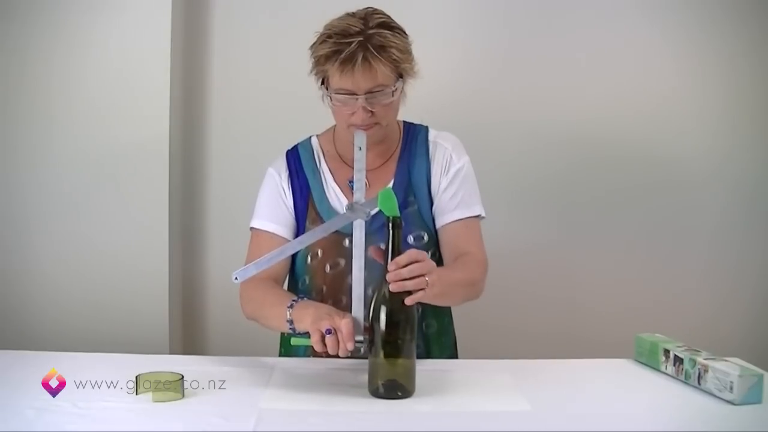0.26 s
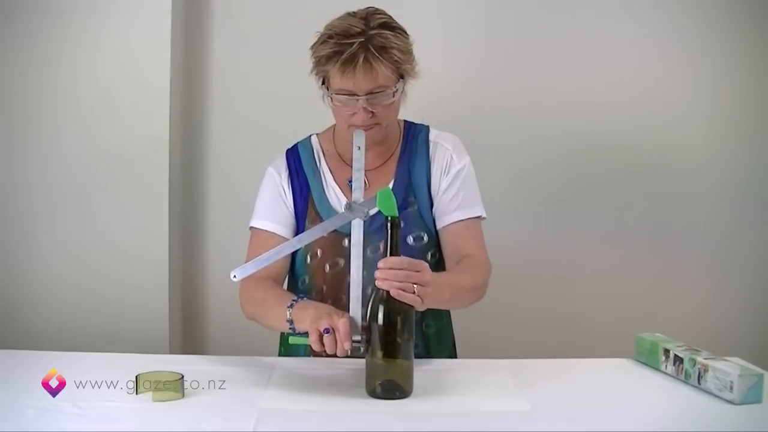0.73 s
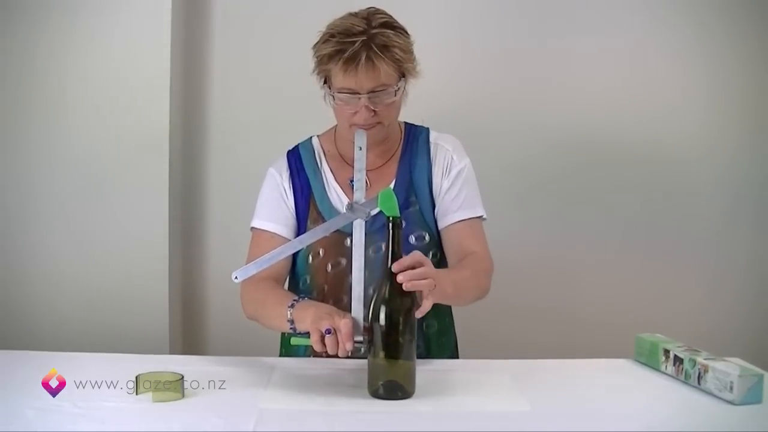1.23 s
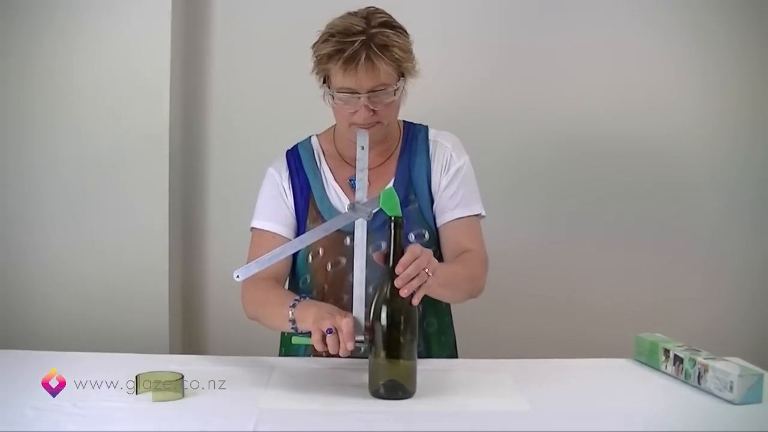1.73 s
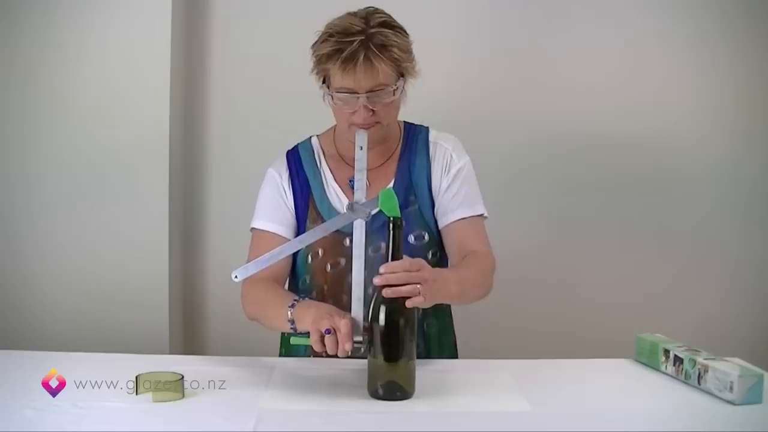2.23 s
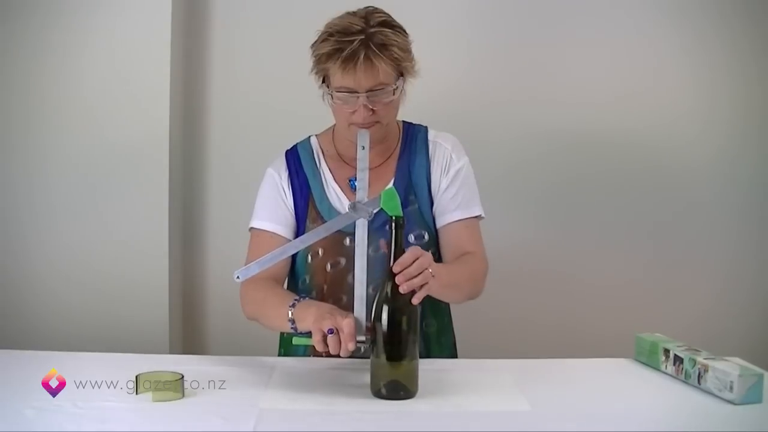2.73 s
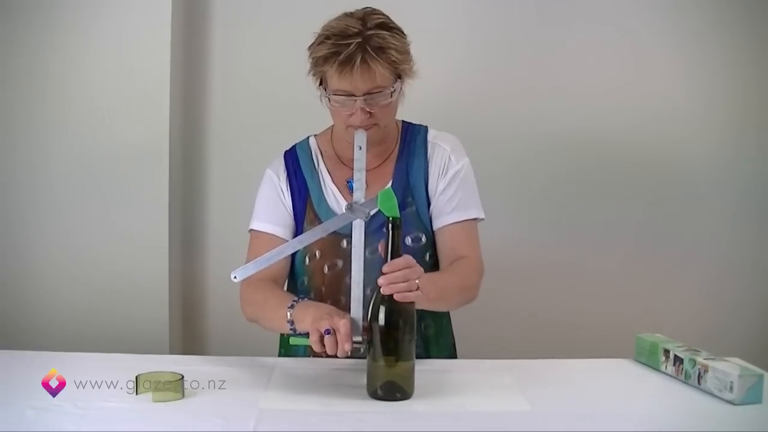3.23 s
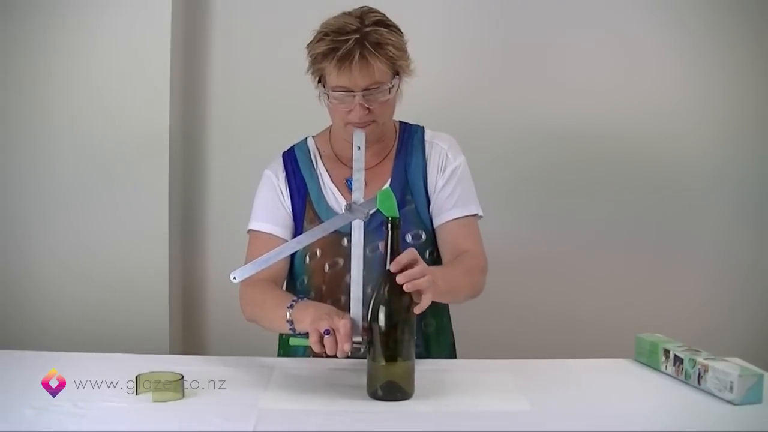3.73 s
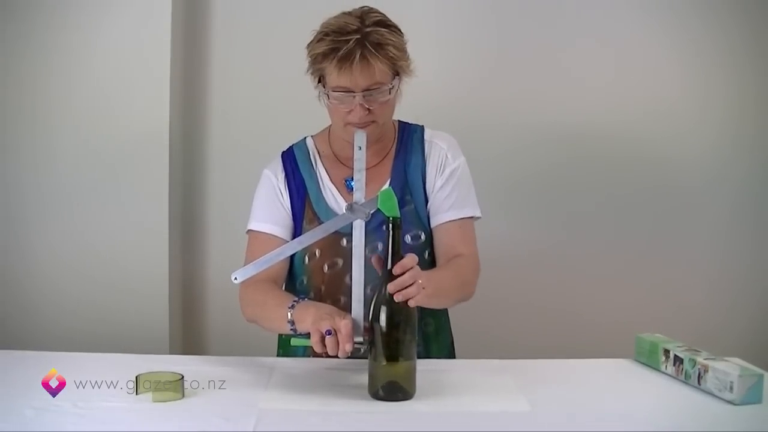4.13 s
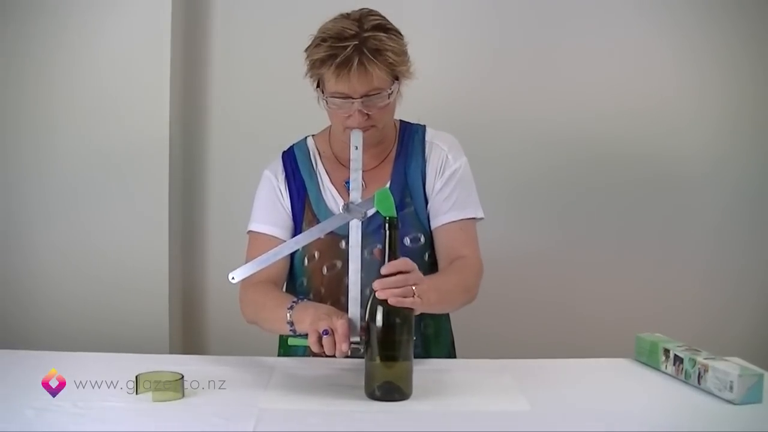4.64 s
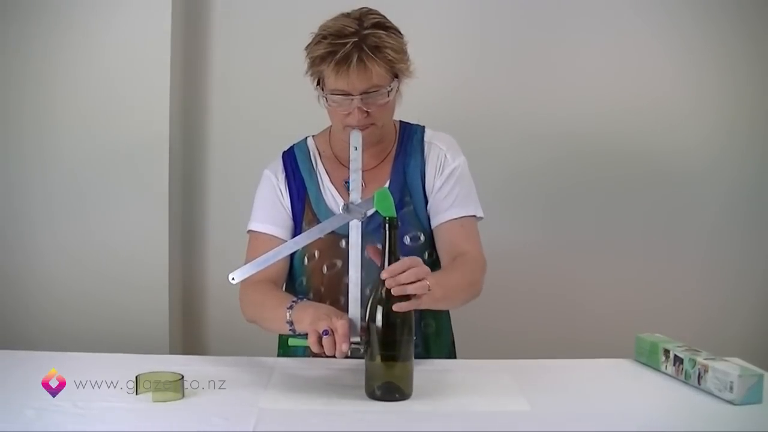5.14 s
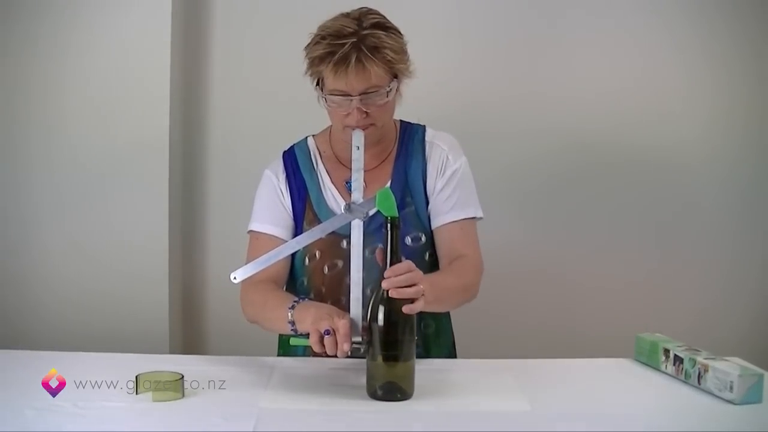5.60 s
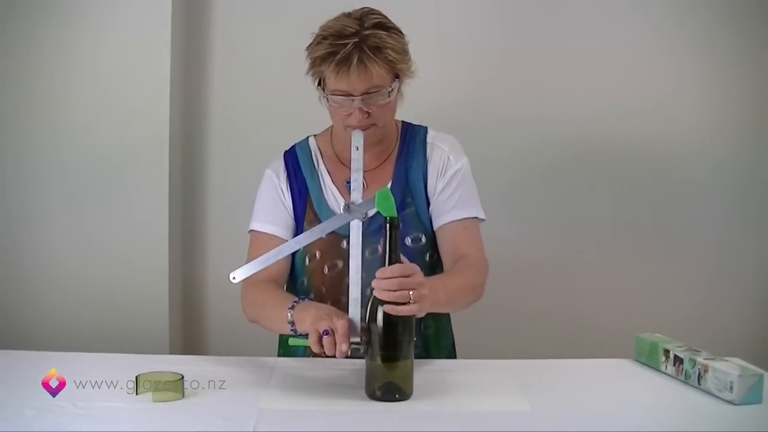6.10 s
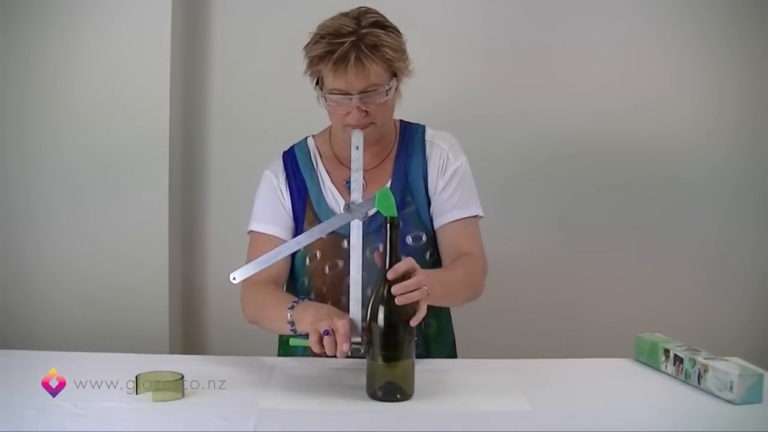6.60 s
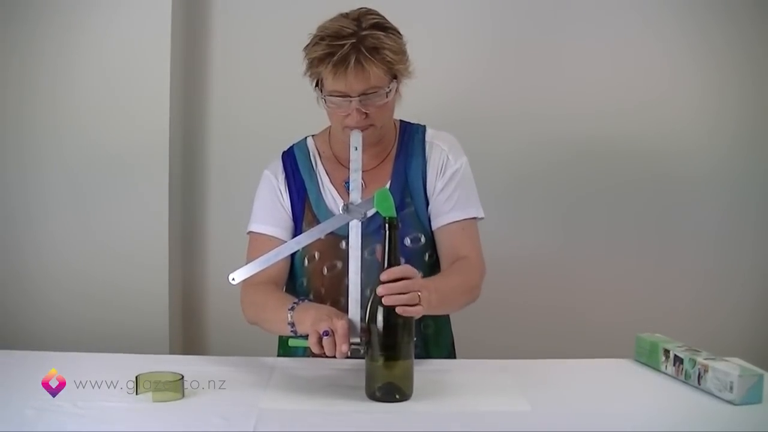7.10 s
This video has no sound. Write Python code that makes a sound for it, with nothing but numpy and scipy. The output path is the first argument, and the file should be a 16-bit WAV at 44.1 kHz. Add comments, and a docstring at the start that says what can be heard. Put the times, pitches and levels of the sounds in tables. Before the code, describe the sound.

In a quiet humming room, a hand-turned bottle crackles and rasps in brief uneven bursts, with a sharp glassy knock past the middle.

```python
"""A glass bottle is turned by hand against the wheel of a metal bottle cutter, on a bench in a small humming room.
After a dry tick of grit, each push crushes a score line in tiny chips and opens with a bright bite of flakes,
while the base grinds on the bench; the glass rings higher when held firmly, and now and then the palm rubs it.
Later the skidding wheel squeaks briefly, a finger ring touches the glass, and the cutter knocks on the bottle.
Chips, slips and rubs are random impulses through resonant filters; ticks, touches and knocks are single rings."""
import sys
import numpy as np
from scipy import signal
from scipy.fft import rfft, irfft
from scipy.io import wavfile

SR = 44100
rng = np.random.default_rng(int(sys.argv[2]) if len(sys.argv) > 2 else 0)


def output_pcm(signal):
    """Save a mono or channel-first signal as 16-bit PCM at the path in sys.argv[1].

    Samples are clipped to [-1, 1] before scaling.
    """
    pcm = np.clip(np.atleast_2d(signal).T, -1, 1) * 32767
    wavfile.write(sys.argv[1], SR, np.round(pcm).astype(np.int16))


N = 324511
TIME = np.arange(N) / SR
EDGE_HZ = 14500  # upper band limit of the sound

# the hand pushes the bottle round against the wheel:
# start_s, length_s, level_db (relative, of the scoring), rise_s, grip (0 loose - 1 firm)
PUSHES = [ (0.254, 0.038, -41, 0.034, 0.058), (0.324, 0.05, -53, 0.01, 0.05),
          (0.461, 0.047, -45.5, 0.0036, 0.067), (0.569, 0.022, -45, 0.0075, 0.043),
          (0.625, 0.054, -38, 0.036, 0.03), (0.708, 0.067, -36.5, 0.016, 0.037),
          (0.99, 0.038, -53.5, 0.018, 0.03), (1.772, 0.089, -43, 0.017, 0.019),
          (1.9, 0.14, -37, 0.015, 0.024), (2.067, 0.051, -36, 0.015, 0.018),
          (2.972, 0.082, -41, 0.011, 0.56), (3.088, 0.22, -39.5, 0.01, 0.04),
          (3.27, 0.071, -35, 0.022, 0.05), (3.345, 0.051, -42, 0.013, 0.064),
          (4.4, 0.068, -58, 0.0068, 0.87), (4.539, 0.063, -40.5, 0.033, 0.98),
          (4.642, 0.16, -36, 0.055, 0.87), (5.567, 0.018, -43.5, 0.012, 0.13),
          (5.628, 0.093, -48, 0.0066, 0.097), (5.757, 0.11, -46, 0.018, 0.07),
          (5.957, 0.07, -55, 0.005, 0.1), (6.029, 0.093, -35.5, 0.063, 0.3),
          (6.883, 0.1, -46.5, 0.0029, 0.76), (7.007, 0.047, -40, 0.0089, 0.79),
          (7.125, 0.023, -47, 0.0053, 0.95), (7.147, 0.041, -41.5, 0.005, 0.95),
          (7.271, 0.026, -45.5, 0.016, 1), ]
# broad spectrum of a breaking chip of glass: frequency_hz, density_db (relative, per Hz)
CHIP_SPECTRUM = [(100, -36), (500, 3), (1100, -5), (2000, -0.5), (2750, 0.5), (3600, 4.5), (4500, -1.5),
                 (5200, -5.5), (6400, -6.5), (8200, -9.5), (9000, -9), (10200, -10.5), (11400, -8),
                 (12800, -16), (15000, -17)]


def amp(db):
    """Gain for a level in dB."""
    return 10 ** (np.asarray(db) / 20)


def unit(x):
    """Scale a signal to rms 1."""
    return x / np.sqrt(np.mean(x ** 2) + 1e-20)


def read(points, hz):
    """Read a curve between its points, along a logarithmic frequency axis."""
    point_hz, value = np.transpose(points)
    return np.interp(np.log(hz + 1), np.log(point_hz + 1), value)


def add(mix, start_s, sound):
    """Lay a sound into the mix, cut off where the mix ends."""
    part = mix[round(start_s * SR):][:len(sound)]
    part += sound[:len(part)]


def wander(hz):
    """Smooth random drift of rms 1, with rates mostly below hz."""
    f = np.fft.rfftfreq(N, 1 / SR)
    spectrum = rfft(rng.standard_normal(N)) * np.exp(-(f / hz) ** 2)
    return unit(irfft(spectrum, N))


def response(spectrum, modes=(), treble_db=0, ring_db=0, size=32768):
    """Causal impulse response, of energy 1, of a broad spectrum with resonances standing on it."""
    f = np.fft.rfftfreq(size, 1 / SR)
    peaks = 1 + sum(amp(db + ring_db) ** 2 / (1 + (2 * (f - hz) / width) ** 2) for hz, width, db in modes)
    shelf_db = treble_db * np.clip((f - 3200) / 1600, 0, 1)
    magnitude = amp(read(spectrum, f) + shelf_db) * np.sqrt(peaks)
    cepstrum = irfft(np.log(magnitude))
    cepstrum[1:size // 2] *= 2  # folding it forward in time makes the ring follow the blow
    cepstrum[size // 2 + 1:] = 0
    h = irfft(np.exp(rfft(cepstrum)))[:size // 2]
    return h / np.linalg.norm(h)


def through(x, h):
    """Let a signal excite a body with impulse response h."""
    return signal.oaconvolve(x, h)[:N]


def crackle(per_s, spread_db):
    """Random fractures, many small and a few large, of rms 1."""
    size = amp(spread_db * np.minimum(rng.exponential(1, N), 4))
    sign = rng.choice([-1, 1], N)
    happens = rng.random(N) < per_s / SR
    return unit(size * sign * happens)


def strikes(rows, spectrum, modes=()):
    """Single blows, each ringing the same body."""
    out = np.zeros(N)
    for start_s, peak_db, *colour in rows:  # colour: treble and extra ring, in dB
        h = response(spectrum, modes, *colour)
        add(out, start_s, amp(peak_db) * h / abs(h).max())
    return out


def stroke(start_s, length_s, level_db, rise_s, release_s):
    """Gain of one movement of the hand: it builds up, holds, and dies away."""
    t = TIME - start_s
    build = np.clip(t / rise_s, 0, 1)
    return amp(level_db) * build * np.exp(-np.maximum(t - length_s, 0) / release_s)


def strokes(rows, rise_s, release_s):
    """Gain of a series of like movements, the strongest at each moment."""
    return np.max([stroke(*row, rise_s, release_s) for row in rows], axis=0)


def background(air_db=-47.72, edge_hz=13700):
    """Soft room noise, near mono in the bass and wider above, with a low hum and wavering drones."""
    # the still room: frequency_hz, density_db (relative, per Hz)
    air_spectrum = [(15, -63), (25, -36), (48, 0), (70, -5.5), (101, -0.5), (150, -3.5), (185, 1),
                    (222, -14), (267, -3), (397, -5.5), (573, -13), (620, -11), (1170, -19.5),
                    (1330, -21.5), (13500, -40.5)]
    # how wide the room noise is: frequency_hz, side_minus_mid_db
    air_width = [(60, -17), (110, -17), (200, -15), (380, -16.5), (700, -12), (1290, -8), (2380, -8),
                 (4400, -7), (8120, -13), (15000, -22)]
    # hum and drones: pitch_hz, level_db (rms), width_hz (from the drifting phase)
    hum_tones = [(99.1, -56.5, 0.36), (181.4, -59.5, 4.24), (259.4, -56.5, 12.8), (616, -72.5, 8.2)]
    f = np.fft.rfftfreq(N, 1 / SR)
    colour = amp(read(air_spectrum, f)) * (f < edge_hz)
    mid = irfft(rfft(rng.standard_normal(N)) * colour, N)
    side = irfft(rfft(rng.standard_normal(N)) * colour * amp(read(air_width, f)), N)
    air = amp(air_db) * unit(np.array([mid + side, mid - side]))
    hum = 0
    for hz, level_db, width_hz in hum_tones:
        drift = np.cumsum(rng.standard_normal(N)) * np.sqrt(2 * np.pi * width_hz / SR)
        waver = amp(2.1 * wander(hz=3.9))
        hum = hum + amp(level_db) * unit(np.sin(2 * np.pi * hz * TIME + drift) * waver)
    return (air + hum) * amp([[.3], [-.3]])  # a touch louder on the left


def grit():
    """Dry ticks of grit: single impulses with a broad spectrum and no resonances."""
    # start_s, peak_db (dry), treble_db
    ticks = [(0.1408, -34.5, -5), (0.3436, -26.5, -20), (0.4502, -22.5, -1), (1.7195, -29.5, -7),
             (1.8757, -19.5, -5), (2.6748, -39, 0), (6.2462, -30.5, -7)]
    # frequency_hz, density_db (relative, per Hz)
    grit_spectrum = [(200, -18), (1000, -12), (2200, 1.5), (4000, 4), (6000, -5.5), (11000, -4.5),
                     (15000, -26)]
    return strikes(ticks, grit_spectrum)


def pushing(lag_s=0, release_s=0.018):
    """How hard each push drives the wheel over the glass until it rolls to a stop, as gains: pushes x time."""
    return np.array([stroke(start_s + lag_s, length_s, level_db, rise_s, release_s)
                     for start_s, length_s, level_db, rise_s, _ in PUSHES])


def judder(slips_per_s=80, uneven=.7, fade_s=0.0029, size_db=4, rolling=0.19):
    """The wheel sticks and slips at uneven intervals, on top of a steady roll; rms 1."""
    rate = slips_per_s * np.exp(uneven * wander(hz=61.45))
    count = np.floor(np.cumsum(rate) / SR)
    size = amp(size_db * (2 * rng.random(N) - 3))  # from -3 to -1 times size_db
    slips = np.diff(count, prepend=0) * size
    fading = signal.lfilter([1], [1, -np.exp(-1 / (fade_s * SR))], slips)
    return unit(rolling + fading)


def bottle(fractures, regrip_s=0.0081):
    """The glass rings with each fracture, in the loose or the firm set of resonances as the grip has it."""
    # the bottle held loosely, then firmly: frequency_hz, width_hz, prominence_db (above the broad spectrum)
    loose_modes = [(1980, 35, 6), (2586, 18, 1), (2573, 64, 18), (2903, 28, 18), (3330, 93, 3.5),
                   (4134, 10, 22), (4020, 30, 12.5), (4530, 57, 19), (4690, 50, 18), (5830, 59, 9.5),
                   (7040, 55, 18), (7160, 24, 24), (9330, 110, 18), (10840, 190, 11), (11180, 230, 14),
                   (11980, 82, 17), (14100, 110, 17)]
    firm_modes = [(2815, 20, 20.5), (3048, 70, 15.5), (3127, 51, 13), (4050, 35, 17), (4420, 53, 21.5),
                  (4480, 34, 17.5), (5330, 55, 9.5), (5500, 99, 3), (6810, 100, 16), (7100, 27, 25.5),
                  (8900, 200, 6.5), (11050, 260, 15.5), (12570, 90, 18), (14000, 200, 11)]
    start, _, _, _, grip = np.transpose(PUSHES)
    # the hand takes its grip just before a push
    latest = np.maximum(np.searchsorted(start, TIME + regrip_s) - 1, 0)
    held = rng.random(N) < grip[latest]  # a firmer grip sends more fractures to the firm set
    loose = through(fractures * ~held, response(CHIP_SPECTRUM, loose_modes))
    firm = through(fractures * held, response(CHIP_SPECTRUM, firm_modes))
    return loose + firm


def scoring(level_db=-1.0):
    """Each slip of the rolling wheel crushes a clump of tiny flakes."""
    force = pushing().max(0) * judder()
    return amp(level_db) * bottle(force * crackle(per_s=8000, spread_db=2.5))


def bites(level_db=-3.0, jerk_db=-6.0, opening_db=10.5, softer_db_per_s=420):
    """Where a push starts or the wheel catches, the force jumps at once and a bright burst of flakes dies away."""
    # the wheel catches with a single jerk and flakes break off: start_s, level_db (relative)
    jerks = [(0.594, -28.5), (0.843, -32.5), (2.122, -30.5), (3.6525, -33), (4.3989, -41), (4.417, -35),
             (4.4371, -34.5), (5.9573, -34.5), (6.0137, -33), (6.8126, -33), (6.8414, -32), (6.9328, -26),
             (7.0434, -31)]
    force = np.zeros(N)
    t = np.arange(SR // 10) / SR
    burst = np.exp(-(t / .006) ** 2)
    for start_s, _, push_db, rise_s, _ in PUSHES:
        bite_db = push_db + opening_db - softer_db_per_s * rise_s  # a slower rise bites less
        add(force, start_s, amp(bite_db) * burst)
    for start_s, bite_db in jerks:
        add(force, start_s, amp(bite_db + jerk_db) * burst)
    return amp(level_db) * bottle(force * crackle(per_s=12000, spread_db=1.5))


def grinding(judder_db=1.0, drag_db=-10.5, drag_lag_s=0.016):
    """The base drags over the bench in small slips that drum the bench top."""
    # the base breaks loose and slides on the bench: start_s, length_s, level_db (relative)
    slides = [(0.28, 0.07, -47.5), (0.755, 0.029, -44.5), (1.79, 0.038, -42.5), (1.935, 0.22, -39),
              (3.02, 0.048, -46.5), (3.28, 0.081, -37.5), (3.33, 0.051, -34.5), (4.59, 0.058, -47),
              (4.695, 0.1, -37.5), (5.86, 0.022, -47.5), (6.09, 0.042, -37.5), (7.275, 0.041, -39)]
    # the bench's broad spectrum: frequency_hz, density_db (relative, per Hz)
    bench_spectrum = [(60, -19), (170, -13.5), (260, -2.5), (330, -1), (430, 2), (560, -4.5), (680, -7),
                      (850, -5.5), (1200, -13), (2000, -16.5), (2600, -26), (4000, -35), (10000, -57)]
    # resonances of the bench top: frequency_hz, width_hz, prominence_db (above the broad spectrum)
    board_modes = [(267, 26, 9.5), (424, 6.6, 10), (565, 43, 4), (632, 26, 10)]
    sliding = strokes(slides, rise_s=0.02, release_s=0.041)
    dragging = amp(drag_db) * pushing(drag_lag_s).max(0)  # a little with every push
    slips = crackle(per_s=1600, spread_db=3.0) * unit(amp(judder_db * wander(hz=45)))
    return through(np.maximum(sliding, dragging) * slips, response(bench_spectrum, board_modes))


def rubbing(level_db=-2):
    """Skin sliding on glass: a soft, damped rustle with no ring."""
    # the palm rubs over the glass: start_s, length_s, level_db (relative)
    rubs = [(0.62, 0.11, -43.5), (4.18, 0.23, -61.5), (5.32, 0.025, -51), (6.07, 0.039, -41.5),
            (6.66, 0.079, -55)]
    # the rub's spectrum: frequency_hz, density_db (relative, per Hz)
    skin_spectrum = [(300, -11), (1100, -14), (1900, 2), (3500, 1), (5200, -7), (11000, -14), (15000, -30)]
    pressure = strokes(rubs, rise_s=0.021, release_s=0.013)
    return amp(level_db) * through(pressure * crackle(per_s=2300, spread_db=2.0), response(skin_spectrum))


def squeaking(rise_s=0.02, release_s=0.0062):
    """The skidding wheel sings for a moment in two narrow tones."""
    # the one skid: start_s, length_s, level_db (relative)
    skid = (3.0, 0.068, -46)
    # its tones: pitch_hz, width_hz, prominence_db (above the broad spectrum)
    tones = [(3125, 40, 37), (4390, 35, 40)]
    pressure = stroke(*skid, rise_s, release_s)
    return through(pressure * crackle(per_s=2000, spread_db=3.0), response(CHIP_SPECTRUM, tones))


def ring_touches():
    """The finger ring taps the glass as the hand takes a new hold, and high modes of the glass ring."""
    # start_s, peak_db (dry)
    touches = [(3.6522, -38.5), (4.2268, -38.5), (6.7252, -23.5), (6.7272, -21.5), (6.7298, -40)]
    # the tap's broad spectrum: frequency_hz, density_db (relative, per Hz)
    tap_spectrum = [(200, -32), (1200, -17), (3000, 2), (4600, -4.5), (6500, -1), (12000, -5), (15000, -8)]
    # high modes of the glass: frequency_hz, width_hz, prominence_db (above the broad spectrum)
    glass_modes = [(2560, 33, 12), (3400, 18, 23.5), (5660, 33, 25), (6150, 24, 9), (6568, 10, 26.5),
                   (8000, 22, 11), (9394, 29, 21), (11520, 40, 13), (14020, 36, 12)]
    return strikes(touches, tap_spectrum, glass_modes)


def cutter_knocks():
    """The cutter knocks on the bottle and both ring together."""
    # start_s, peak_db (dry), treble_db, extra_ring_db
    knocks = [(5.0634, 0, -0.5, -7), (5.3694, -17, -8.5, -7.5), (5.4184, -20, -10.5, -5),
              (6.9511, -23.5, -9.5, -3)]
    # the blow's broad spectrum: frequency_hz, density_db (relative, per Hz)
    blow_spectrum = [(100, -46), (350, -29), (700, -23), (1300, -20.5), (2000, -8.5), (2300, -14.5),
                     (3100, 3), (3700, -9.5), (4500, -12.5), (4800, -19), (6000, -25), (7000, -19.5),
                     (8200, -29), (11000, -23.5), (13000, -30), (15000, -36)]
    # cutter and bottle: frequency_hz, width_hz, prominence_db (above the spectrum, before the extra ring)
    knock_modes = [(2485, 43, 18), (2680, 11, 16), (2870, 22, -9.5), (2820, 15, 13), (2910, 24, 14.5),
                   (3120, 10, 9.5), (3170, 11, 11.5), (3310, 5, 10), (3980, 16, 21.5), (4280, 20, 20),
                   (4450, 25, 16.5), (4440, 63, 26), (4490, 35.5, 23), (6500, 14, 3.5), (6729, 29, 23),
                   (7740, 18, 25), (8660, 12, 27), (9450, 38, 27), (10830, 48, 20.5), (14050, 90, 11)]
    return strikes(knocks, blow_spectrum, knock_modes)


def room(x, wet_db, side_db=-13, treble_loss_db=2, build_s=0.0013, early=2.96, early_s=0.026):
    """Direct sound plus dense reflections, which differ a little between left and right."""
    # the room's decay: frequency_hz, t60_s (before the early boost)
    decay = [(200, 0.57), (1000, 0.33), (3000, 0.49), (7000, 0.57), (14000, 0.073)]
    count = SR * 3 // 4 // 10
    taps = np.zeros((2, count * 10))
    at = np.arange(count) * 10 + rng.integers(0, 10, (2, count))  # one reflection in every ten samples
    np.put_along_axis(taps, at, np.sign(rng.standard_normal(at.shape)), 1)
    hz, t, z = signal.stft(taps, SR, nperseg=256)
    walls = amp(-treble_loss_db * hz / EDGE_HZ)[:, None]  # the walls swallow some treble
    fading = np.exp(-np.log(1000) * t / read(decay, hz)[:, None])
    tail = signal.istft(z * walls * fading, SR, nperseg=256)[1]
    t = np.arange(tail.shape[1]) / SR
    tail = tail * (1 + early * np.exp(-t / early_s)) * (1 - np.exp(-t / build_s))  # near surfaces answer first
    mid, side = (amp(wet_db) * through(x, h / np.linalg.norm(h)) for h in tail)
    return x + mid + amp(side_db) * np.array([side, -side])


def scene():
    """Cutting, sliding and knocks at the bench, heard through the room."""
    cutting = room(scoring() + bites() + squeaking(), wet_db=-4.5, side_db=-17, treble_loss_db=3)
    sliding = room(grinding() + rubbing(), wet_db=-6.0, side_db=-24.5)
    knocks = room(cutter_knocks() + ring_touches(), wet_db=-3.0, side_db=-18.5)
    knocks = knocks * amp([[-.3], [.3]])  # a touch louder on the right
    ticks = room(grit(), wet_db=-4.5)
    return cutting + sliding + knocks + ticks + background()


def record(dry):
    """Peaks are clipped just below full scale; then a low-pass limits the band."""
    low_pass = signal.firwin(511, EDGE_HZ, window=("kaiser", 9), fs=SR)
    return signal.oaconvolve(np.clip(dry, -.93, .93), low_pass[None], "same")


dry = scene()
out = record(dry)
output_pcm(out)
```